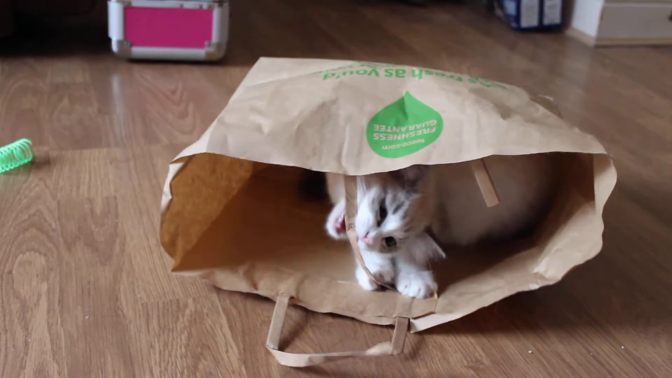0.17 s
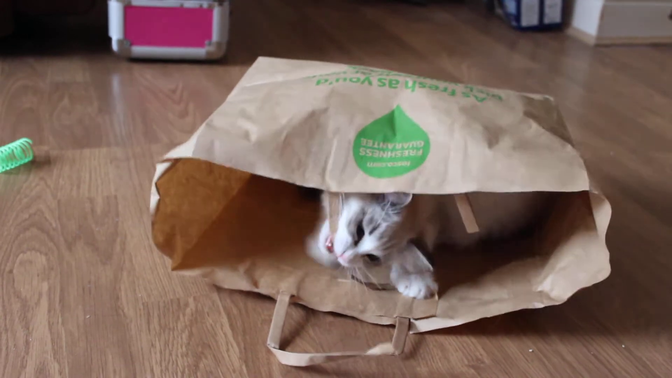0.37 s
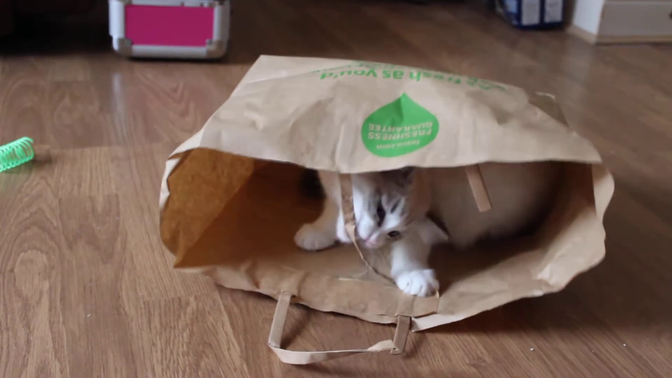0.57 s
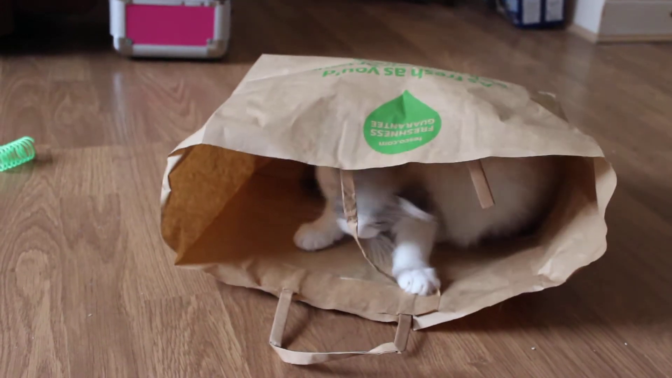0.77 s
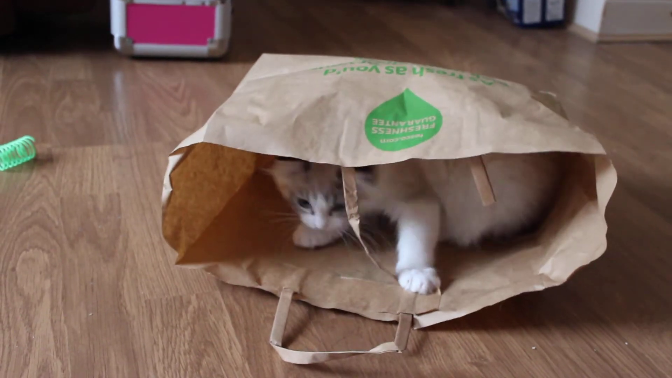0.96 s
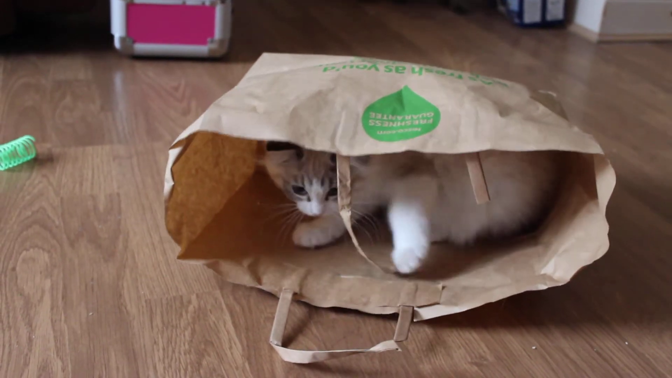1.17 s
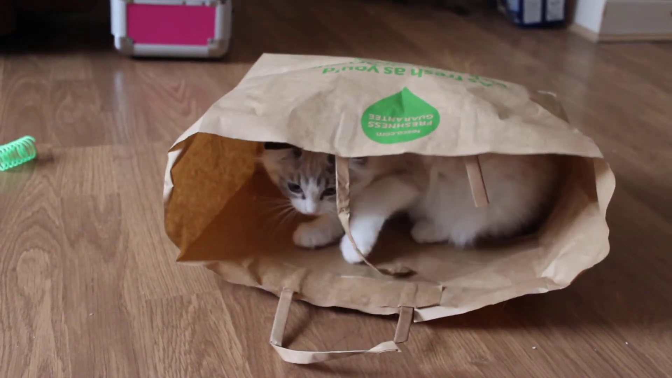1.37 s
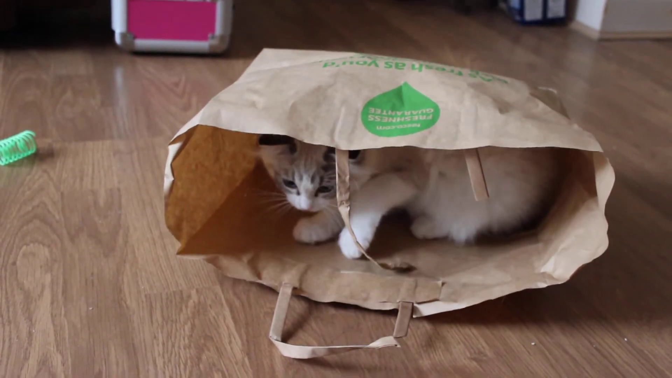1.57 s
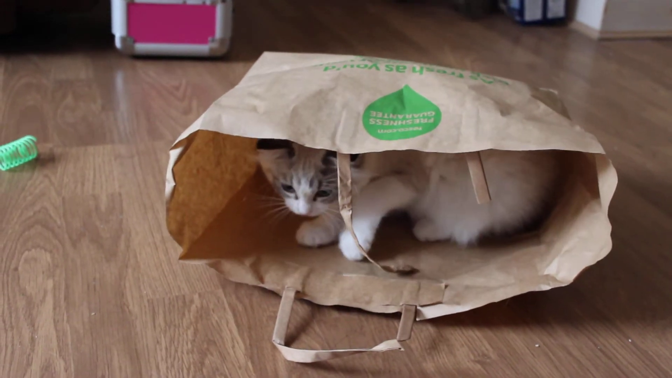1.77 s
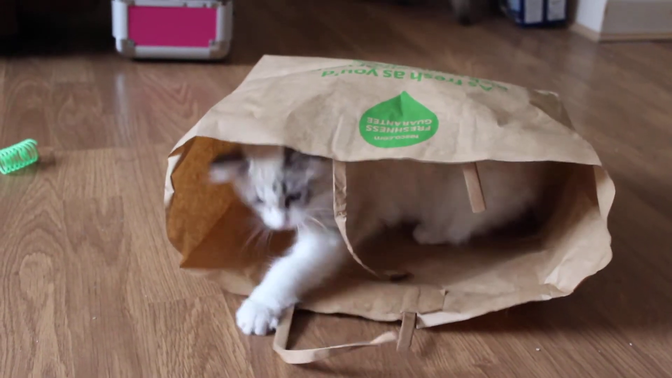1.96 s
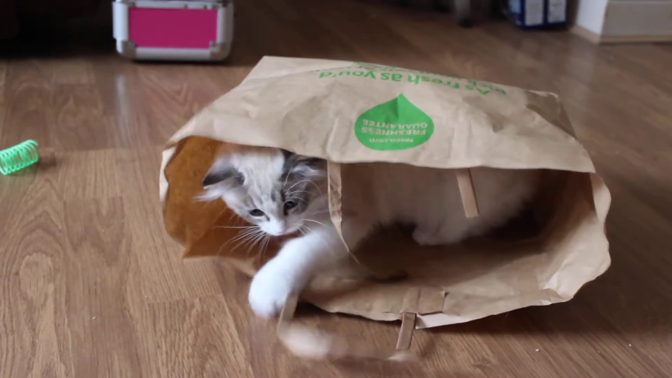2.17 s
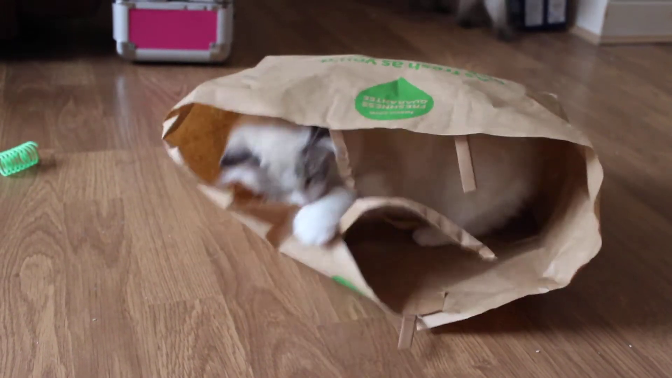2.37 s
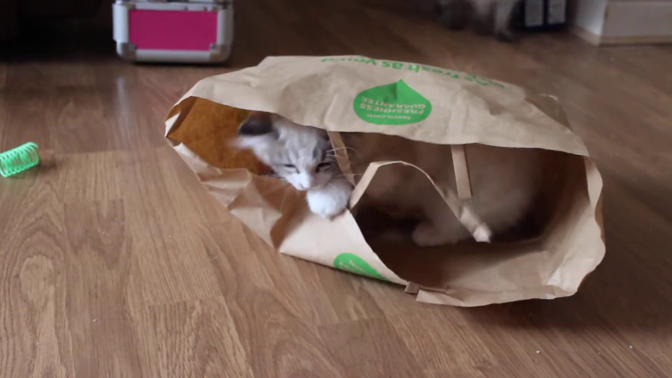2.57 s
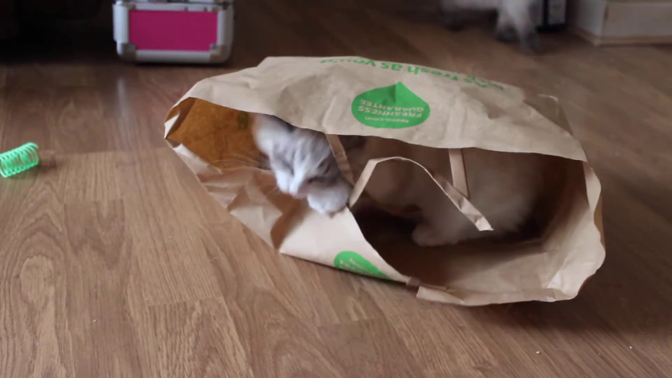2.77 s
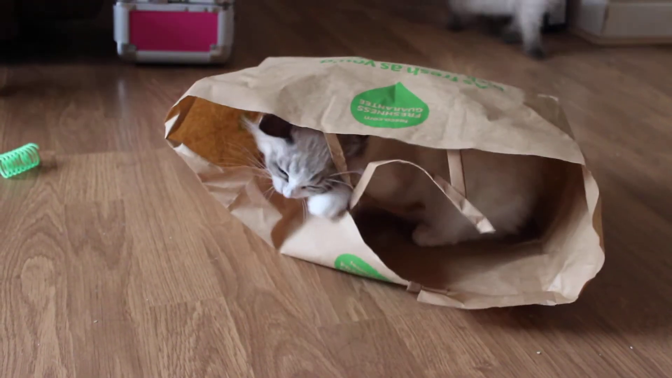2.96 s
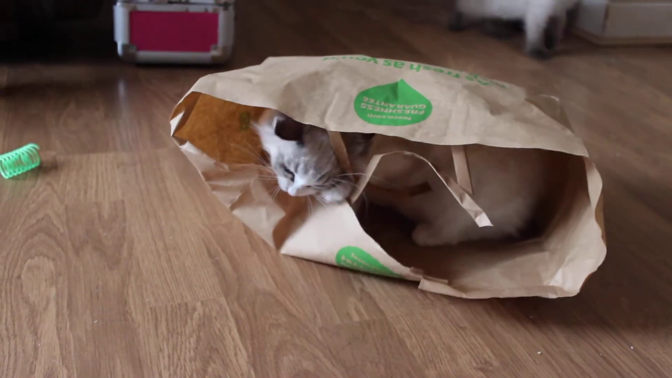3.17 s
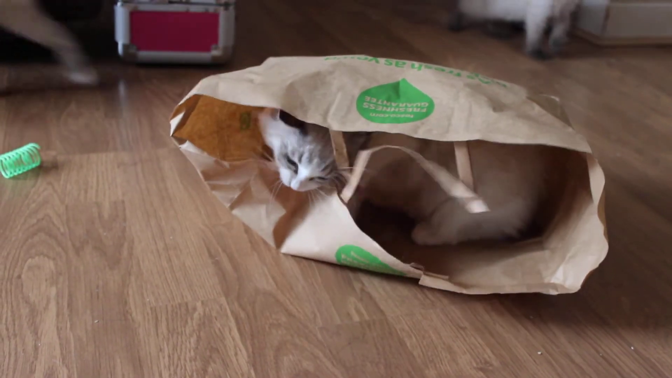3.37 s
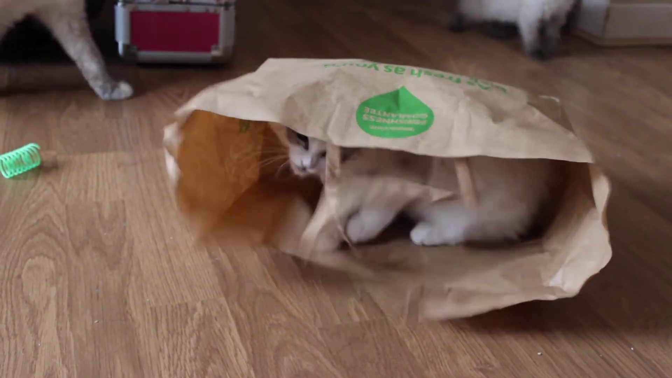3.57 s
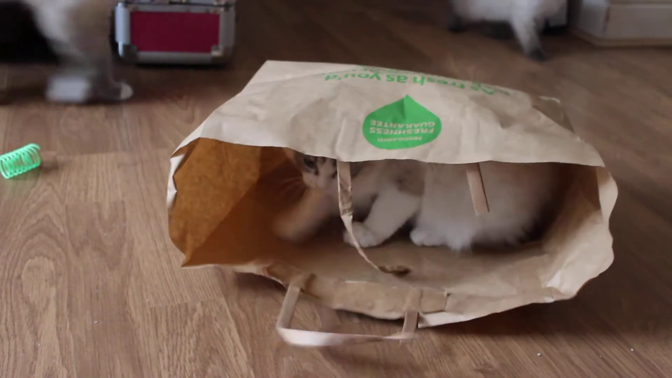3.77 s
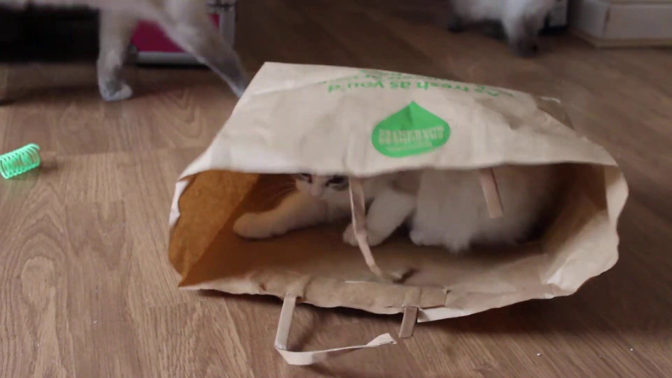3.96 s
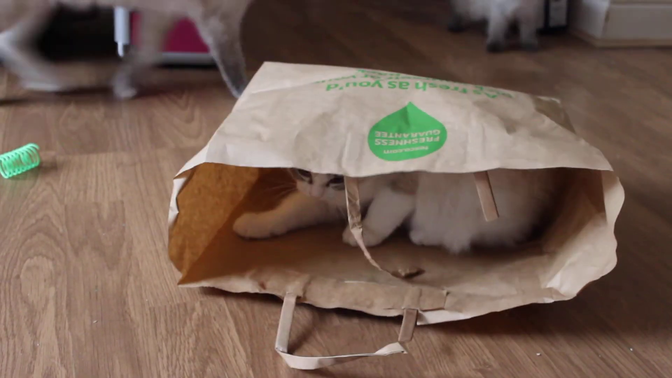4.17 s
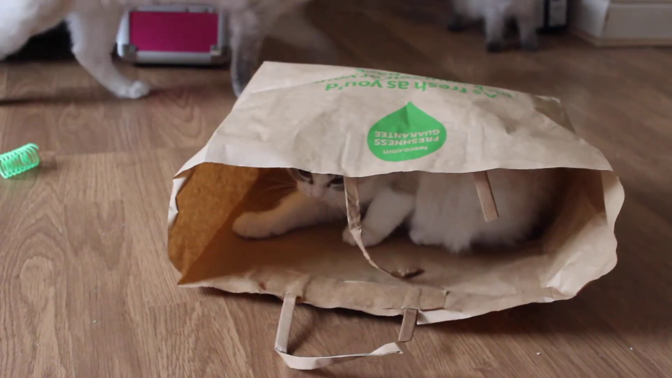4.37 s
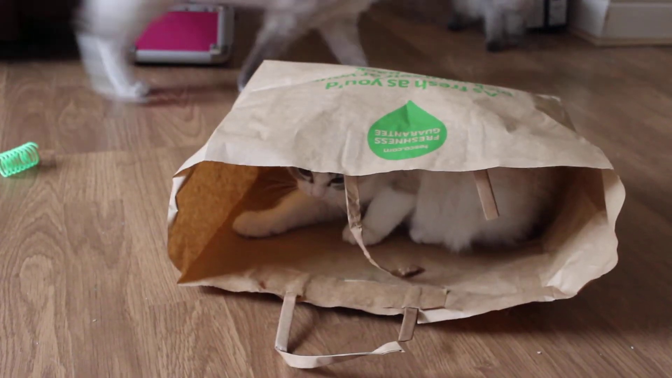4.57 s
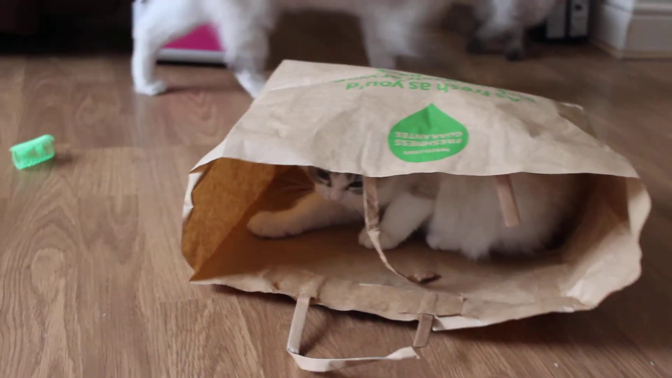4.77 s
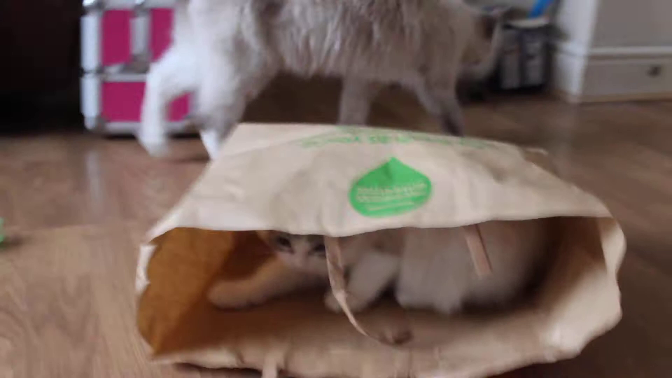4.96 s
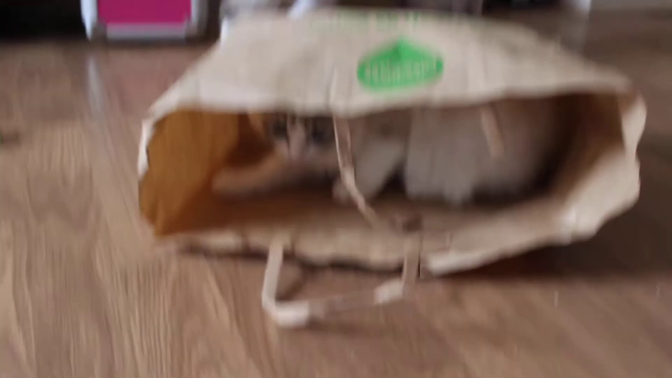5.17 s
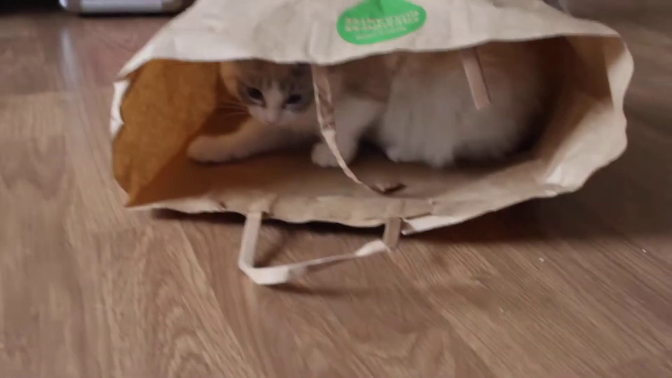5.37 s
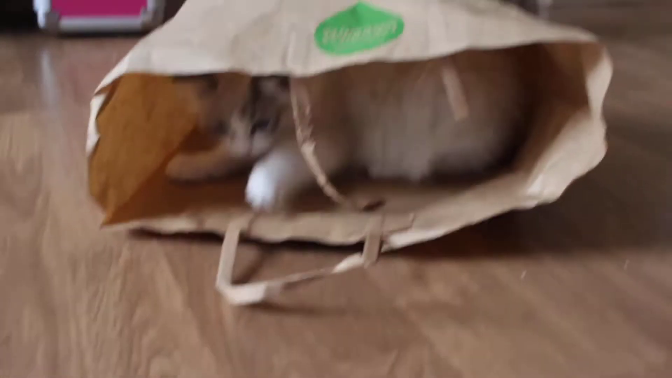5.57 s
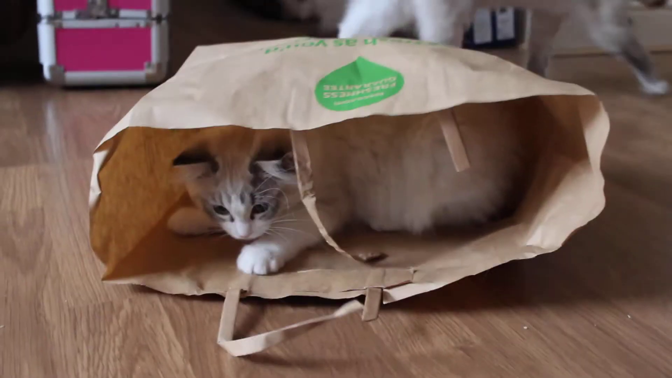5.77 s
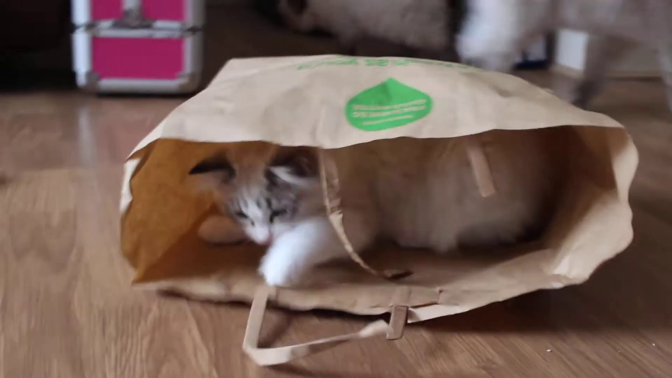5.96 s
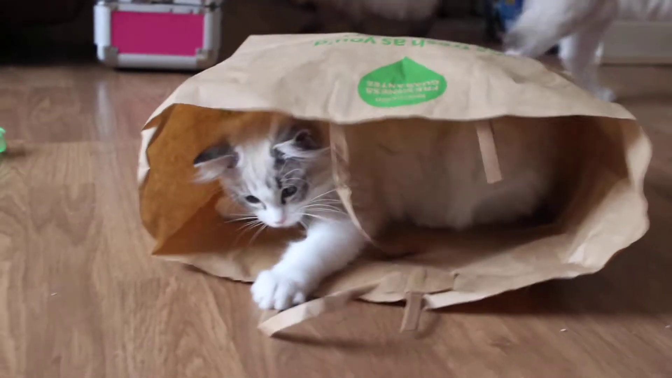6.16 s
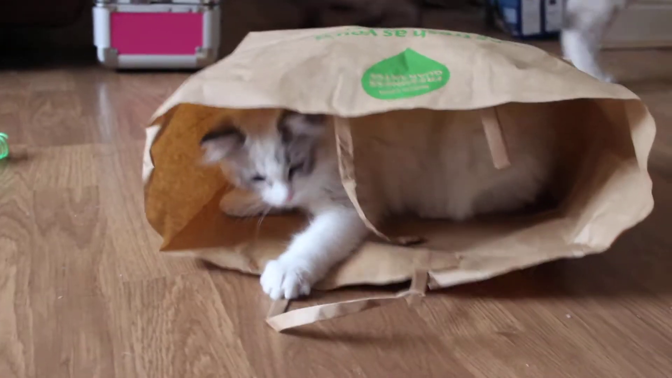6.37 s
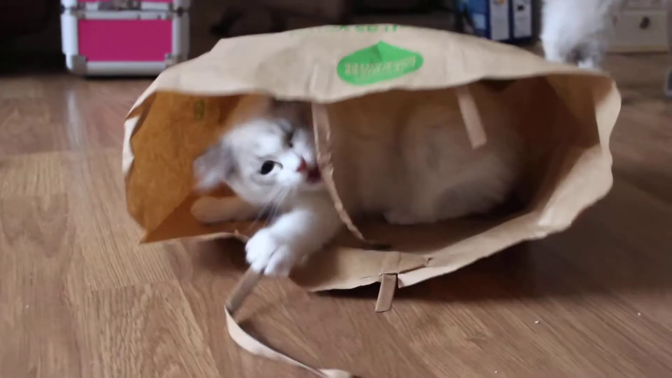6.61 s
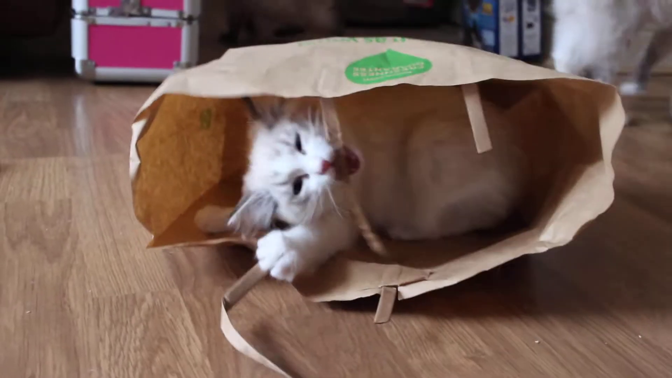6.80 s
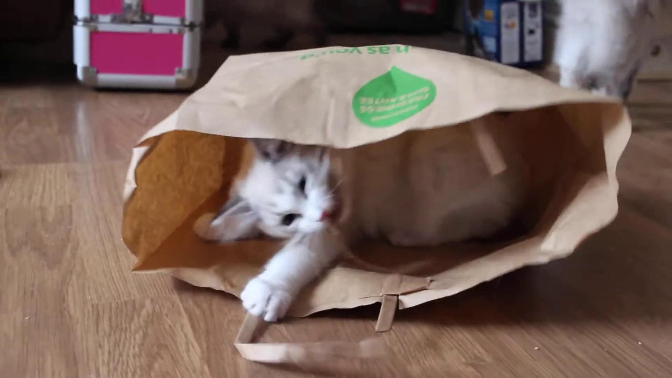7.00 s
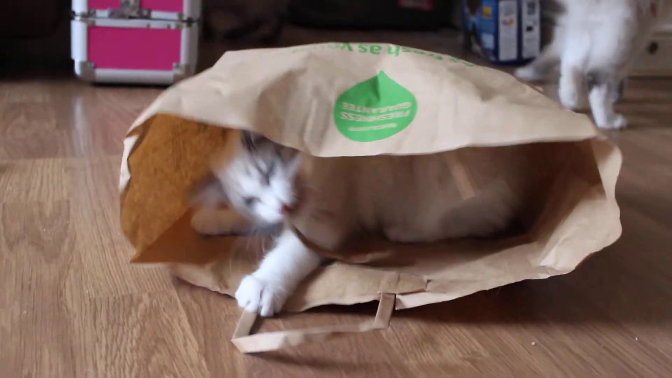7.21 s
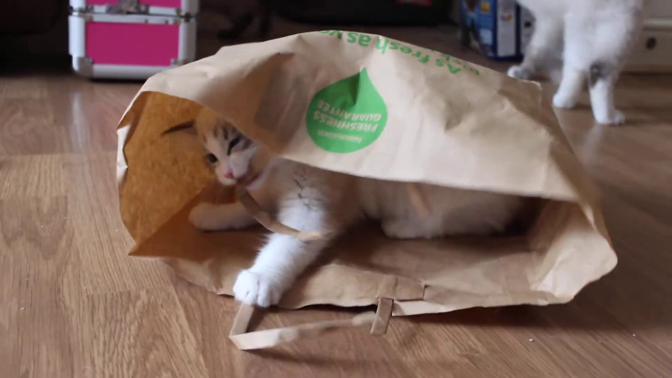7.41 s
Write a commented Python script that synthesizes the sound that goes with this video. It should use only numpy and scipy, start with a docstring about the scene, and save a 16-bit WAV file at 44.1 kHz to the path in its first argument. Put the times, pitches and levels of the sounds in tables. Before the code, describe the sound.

Crisp paper creases pop and rustle in irregular bursts as a small animal paws a bag, interrupted by dull microphone bumps and a cloth swish.

```python
"""A quiet room with a wooden floor, where a kitten moves about in a paper bag.
Creases snap as clicked noise bursts, paws and body thump the walls as damped sines, and bouts of movement
crackle, boom and hiss through the bag's resonances; fur drags sing in narrow noise bands, a small tag tinkles.
The recorder shifts in the hand with ticks, knocks and rubs, and cloth swishes past the microphone.
Behind it lie shaped hiss with a faint hum and a wandering low rumble."""
import sys
import numpy as np
from scipy import signal
from scipy.fft import rfft, irfft
from scipy.io import wavfile

SR = 44100
rng = np.random.default_rng(int(sys.argv[2]) if len(sys.argv) > 2 else 0)


def bounce(signal):
    """Save signal as a 16-bit WAV file at the path given by the first command-line argument."""
    frames = np.transpose(np.atleast_2d(signal))
    limited = np.clip(frames, -1, 1)
    pcm = np.round(limited * 32767).astype(np.int16)
    wavfile.write(sys.argv[1], SR, pcm)


N = 328104  # length in samples

# Creases that buckle, and a few sharp repeats about 10 ms after a loud snap: start_s, level_db (peak of the
# body), pitch_hz, treble_db (edge against body)
SNAPS = [(0.5197, -30.5, 930, -3), (0.574, -36, 1680, -25), (0.61, -45, 2400, -25), (1.059, -25, 2130, 1.5),
         (1.0804, -19.5, 3040, -16), (1.744, -42, 2160, 8), (1.9761, -24, 4670, 4),
         (2.212, -17.5, 5600, -2), (2.3371, -3, 2200, -40), (2.346, -9, 2780, -26),
         (2.3596, -14.5, 2570, 1.5), (2.4393, -14.5, 1650, -15), (2.4573, -7, 1610, 13.5),
         (2.495, -18.5, 2090, -24), (2.539, -19, 1810, -29), (2.8153, -27, 1780, 3.5),
         (2.8718, -23, 2700, 4), (2.9873, -10.5, 1520, -20), (2.989, -3.5, 4250, 4.5),
         (3.316, -9.5, 2170, -44), (3.48, -23.5, 3240, 1), (3.521, -25.5, 825, 14.5),
         (3.621, -15, 2370, -35), (3.632, -10, 2160, -38), (3.6574, -14, 2200, -30),
         (3.709, -18.5, 2000, 5), (3.721, -17, 3150, -4), (3.9036, -25, 2280, -7),
         (3.9424, -19.5, 2270, -48), (3.986, -23.5, 2490, -37), (4.0141, -12.5, 2060, -1),
         (4.0254, -17.5, 2600, 2), (6.0877, -17.5, 3100, -6), (6.1337, -23, 1100, 1.5),
         (6.1851, -26, 2920, -4), (6.3817, -10, 2730, -26), (6.394, -29, 3000, -20),
         (6.4069, -16.5, 3200, 4), (6.5183, -23, 1780, 0), (6.5814, -25.5, 1400, -34),
         (6.612, -19, 2580, -6), (6.6255, -26, 1470, 4.5), (6.639, -34, 1010, 8),
         (6.8632, -31.5, 7140, 0.5), (6.9599, -21, 1450, 3.5), (6.99, -18.5, 2600, -33),
         (7.127, -21.5, 1400, -25), (7.2479, -16, 1280, -17), (7.3293, -12, 3300, -3.5),
         (7.3633, -4.5, 2330, -10.5)]
# Paws and body against walls and floor: start_s, level_db, pitch_hz
THUMPS = [(0.0572, -46, 377), (0.2507, -36, 403), (0.5208, -25, 406), (1.2459, -35.5, 286),
          (1.4546, -34.5, 295), (1.85, -44.5, 248), (1.9433, -32, 243), (2.21, -29.5, 170),
          (2.4396, -27, 364), (2.7125, -22.5, 238), (2.8237, -21.5, 410), (3.4622, -21, 520),
          (3.5215, -16.5, 368), (3.6179, -18.5, 548), (3.7099, -24, 440), (4.88, -35.5, 415),
          (4.898, -29, 420), (4.911, -44, 450), (6.6975, -35.5, 356), (7.247, -26, 248),
          (7.3356, -26.5, 380)]
# Bouts of movement: start_s, length_s, crackle_db, manner (negative leans on the walls, positive slides)
RUSTLES = [(0.046, 0.063, -49.5, -1.4), (0.326, 0.044, -60, 0.74), (0.467, 0.14, -50.5, -2.9),
           (1.05, 0.065, -43.5, 0.055), (1.244, 0.067, -59.5, -1.4), (1.45, 0.11, -78, -1.7),
           (1.935, 0.14, -42, -0.13), (2.07, 0.092, -58, 0.68), (2.162, 0.24, -37, -0.38),
           (2.332, 0.11, -35, -0.19), (2.43, 0.14, -39, -0.1), (2.581, 0.13, -46, 0.36),
           (2.71, 0.057, -43, 0.51), (2.806, 0.11, -39.5, -2), (3.151, 0.18, -52, 0.44),
           (3.336, 0.053, -36.5, 0.2), (3.416, 0.16, -34, -0.72), (3.589, 0.17, -36.5, -0.29),
           (3.896, 0.11, -42, -1.3), (4.008, 0.066, -37.5, -0.083), (5.856, 0.23, -55.5, 0.46),
           (6.069, 0.042, -33.5, -0.014), (6.213, 0.044, -46, -1.8), (6.3, 0.14, -57, 0.65),
           (6.39, 0.096, -44, -0.32), (6.495, 0.14, -40, -0.47), (6.679, 0.11, -44.5, -0.44),
           (6.899, 0.15, -43.5, 0.24), (7.07, 0.053, -42, 0.65), (7.186, 0.11, -50, 0.94),
           (7.242, 0.075, -38, -0.001), (7.321, 0.093, -32.5, -0.47)]
# Fur or a finger drags on one spot: start_s, length_s, level_db, pitch_hz (at the start)
DRAGS = [(1.019, 0.074, -53, 2650), (1.079, 0.083, -47.5, 3550), (5.576, .04, -44, 1550),
         (5.693, 0.06, -48, 1550), (6.395, 0.05, -42, 3100)]
# Touches of the tag: start_s, level_db
TAG_TOUCHES = [(1.3015, -42), (1.3042, -34.5), (1.374, -47), (1.3866, -48)]
# Ringing modes of the tag: pitch_hz, level_db, t60_s
TAG_MODES = [(2540, -2, 0.04), (4780, 10, 0.011), (9200, -22, 0.026)]
# Resonances of the paper bag: pitch_hz, width_hz, level_db
BAG_RESONANCES = [(390, 256, 6.5), (676, 130, 11.5), (1400, 44, 2), (1700, 130, -9.5), (2723, 220, 6.5),
                  (4250, 130, 5), (5730, 1450, 6.5), (6900, 270, 13)]
# Spectrum of the sliding hiss: frequency_hz, density_db
SLIDE_SPECTRUM = [(1180, -39), (2000, -4.5), (2770, -4), (3580, -7), (7740, -9), (15500, -28)]
# Ticks of the recorder's case in the hand: start_s, level_db (peak of the body), pitch_hz, treble_db
CASE_TICKS = [(4.75, -27.5, 830, -6), (4.767, -23.5, 1470, -7), (4.778, -28, 3230, -10),
              (4.83, -20.5, 880, -18), (4.845, -25, 3830, -12), (4.851, -28, 3800, -14),
              (4.887, -30, 3800, -15), (4.931, -18, 950, -36), (4.959, -17.5, 1610, -1.5),
              (4.975, -19.5, 2170, 5.5), (5.311, -26, 1040, -34), (5.533, -30, 930, -40),
              (5.578, -32.5, 1600, -13), (5.597, -32, 1350, -20), (5.614, -20.5, 1520, -9),
              (5.673, -24, 1100, -34), (5.743, -36, 907, -16), (5.776, -42, 3280, -6),
              (5.827, -33.5, 1210, -26), (5.886, -15.5, 1380, -9)]
# Knocks on the case: start_s, level_db, pitch_hz
CASE_KNOCKS = [(0.07, -35, 109), (4.7247, -17, 141), (4.7665, -31, 258), (4.838, -30, 60),
               (4.9335, -9, 141), (5.3127, -14.5, 422), (5.5038, -17.5, 393), (5.5218, -14.5, 554),
               (5.6151, -16.5, 210), (5.6704, -29, 129), (6.0083, -27, 205), (6.1204, -27, 97),
               (6.3679, -27, 190), (6.4816, -25, 118.3), (6.5186, -26.5, 109)]
# Fingers rub the case: start_s, length_s, crackle_db, manner (negative presses, positive slides)
CASE_RUBS = [(4.734, 0.12, -46.5, -0.041), (4.855, 0.18, -42.5, -0.85), (5.298, 0.088, -44.5, -0.34),
             (5.512, 0.094, -44.5, -0.38), (5.601, 0.23, -48.5, -0.25), (5.75, 0.029, -69.5, 1.36)]
# Level curve of the cloth swish: time_s, level_db
SWISH_CURVE = [(4.55, -62.5), (4.9, -49.5), (4.96, -38), (5.01, -44), (5.5, -53.5), (5.95, -87)]
# Decay of the room by frequency: frequency_hz, t60_s
ROOM_DECAY = [(200, 0.28), (600, 0.3), (1500, 0.2), (4000, 0.35), (10000, 0.047)]
# Spectrum of room tone and microphone hiss, with a hum near 100 Hz: frequency_hz, density_db
QUIET_SPECTRUM = [(20, -11), (60, -11.5), (85, -13), (100, -4), (120, -11.5), (560, -12), (690, -11.5),
                  (1050, -14.5), (15500, -26)]

WALL_KICK_DB, WALL_KICK_HZ = -22.5, 393  # every snap also kicks the wall, dB against the snap's level
BOOM_DB, BOOM_PER_MANNER_DB = -1.5, -2  # wall boom against the crackle
HISS_DB, HISS_PER_MANNER_DB = -6.5, 17  # sliding layer against the crackle
SWELL_SHARE, SAG_DB, STOP_SHARE = 0.22, -2.5, 0.25  # shares of a bout's length; sag in dB
FINE_TICK_DB, RESTING_DB = -9, -49.5  # finest ticks: against a bout's crackle, and at rest
DRAG_WIDTH, DRAG_SAG = 0.13, 0.056  # shares of the pitch: width setting, fall to the end
ROOM_DB, FIRST_WALL_S, BUILD_S, WALL_CUT_HZ = -12.5, 0.005, 0.0023, 5000
QUIET_DB, RUMBLE_DB, RUMBLE_SWING_DB = -54, -69, 4
CUTOFF_HZ = 16300  # top of the microphone's range


def from_db(db):
    """Decibels to amplitude."""
    return 10 ** (np.asarray(db) / 20)


def rms_one(x):
    """Scale to an rms of 1."""
    return x / np.sqrt(np.mean(x ** 2) + 1e-20)


def at_hz(points, hz):
    """Read a curve between its points along log frequency."""
    frequencies, values = np.array(points).T
    return np.interp(np.log(hz), np.log(frequencies), values)


def filtered(x, order, hz, kind):
    """Butterworth filter."""
    return signal.sosfilt(signal.butter(order, hz, kind, fs=SR, output="sos"), x)


def band(x, low_hz, high_hz):
    """Keep a band, its top limited to 0.45 of the sample rate."""
    return filtered(x, 2, [low_hz, min(high_hz, .45 * SR)], "band")


def resonance(x, hz, width_hz):
    """Two-pole ringing, with a gain near 1 on its pitch."""
    r = np.exp(-np.pi * width_hz / SR)
    zeros = (1 - r * r) / 2 * np.array([1, 0, -1])
    poles = [1, -2 * r * np.cos(2 * np.pi * hz / SR), r * r]
    return signal.lfilter(zeros, poles, x)


def drift(rate_hz):
    """Slow random wander with an rms of 1, from noise through a double low-pass."""
    r = np.exp(-2 * np.pi * rate_hz / SR)
    noise = rng.standard_normal(N + SR)
    return rms_one(signal.lfilter([1], [1, -2 * r, r * r], noise)[SR:])  # skip the settling second


def coloured(spectrum):
    """Noise shaped to a spectrum; rms 1."""
    hz = np.maximum(np.fft.rfftfreq(N, 1 / SR), 1)
    shaped = rfft(rng.standard_normal(N)) * from_db(at_hz(spectrum, hz))
    return rms_one(irfft(shaped, N))


def add(out, start_s, sound):
    """Mix a sound into the output at its start."""
    i = round(start_s * SR)
    out[i:i + len(sound)] += sound[:len(out) - i]


def in_bag(x, plain_db):
    """The bag's resonances, their signs alternating, over a plain path."""
    out = from_db(plain_db) * x
    for k, (hz, width_hz, db) in enumerate(BAG_RESONANCES):
        out = out + (-1) ** k * from_db(db) * resonance(x, hz, width_hz)
    return out


def snaps(events, decay_s, plain_db):
    """A sudden buckle: a burst of a few ms rings around its own pitch, with a shorter bright edge."""
    out, t = np.zeros(N), np.arange(1500) / SR
    chance = rng.standard_normal((len(events), 2, len(t)))
    for (start_s, db, hz, treble_db), (body_noise, edge_noise) in zip(events, chance):
        # the fold lets go with one sharp click
        burst = band(body_noise * np.exp(-t / decay_s) + 1.37 * (t == 0), 496, 3930)
        ring = resonance(resonance(burst, hz, 0.69 * hz), hz, 0.69 * hz)
        body = in_bag(burst, plain_db) + from_db(14.5) * ring
        edge = band(edge_noise * np.exp(-t / (.5 * decay_s)) + 3.1 * (t == 0), 2550, 8270)
        body = body / np.abs(body).max()
        edge = edge / np.abs(edge).max()
        add(out, start_s, from_db(db) * (body + from_db(treble_db) * edge))
    return out


def thumps(events, cycles, rumble_s, rumble_db):
    """A soft push: a damped swing at the wall's pitch, with a short noise rumble around it."""
    out, t = np.zeros(N), np.arange(3000) / SR
    chance = rng.standard_normal((len(events), len(t)))
    soft_start = 1 - np.exp(-t / 0.0012)
    for (start_s, db, hz), noise in zip(events, chance):
        swing = -np.sin(2 * np.pi * hz * t) * np.exp(-t * hz / cycles)
        rumble = rms_one(band(noise, 0.59 * hz, 1.88 * hz)) * np.exp(-t / rumble_s)
        add(out, start_s, from_db(db) * (swing + from_db(rumble_db) * rumble) * soft_start)
    return out


def rustle(table, low_hz, high_hz, plain_db):
    """Small creases crackle, walls boom loosely, and sliding adds wavering hiss with the finest crackle."""
    boom = band(grains(600, spread_db=2.0, clump_db=4.5), 98, 600)
    wall_hz, wall_width_hz = BAG_RESONANCES[0][:2]
    boom = rms_one(boom + from_db(-7.0) * resonance(boom, wall_hz, wall_width_hz))
    hiss = from_db(3.94 * drift(60)) * coloured(SLIDE_SPECTRUM)
    slide = hiss + from_db(-2.5) * crackle(3000, 12800, plain_db)
    return (bouts(table, 0, 0) * crackle(low_hz, high_hz, plain_db)
            + bouts(table, BOOM_DB, BOOM_PER_MANNER_DB) * boom
            + bouts(table, HISS_DB, HISS_PER_MANNER_DB) * slide)


def bouts(table, base_db, per_manner_db):
    """Each bout swells fast, sags a little and stops; its manner sets the mix."""
    t, gain = np.arange(N) / SR, np.zeros(N)
    for start_s, length_s, db, manner in table:
        corners = start_s + length_s * np.array([0, SWELL_SHARE, 1 - STOP_SHARE, 1 + STOP_SHARE])
        shape = np.interp(t, corners, [0, 1, from_db(SAG_DB), 0])
        gain += from_db(db + base_db + per_manner_db * manner) * shape
    return gain


def crackle(low_hz, high_hz, plain_db):
    """Each small crease clicks at one of seven pitches and rings briefly inside the bag's resonances."""
    clicks = grains(1500, spread_db=3.9, clump_db=5)
    pitches = np.geomspace(low_hz, high_hz, num=7)
    dealt = rng.integers(len(pitches), size=N)
    rings = np.zeros(N)
    for k, hz in enumerate(pitches):
        own = clicks * (dealt == k) + 1e-18  # an inaudible offset
        rings += resonance(resonance(own, hz, 0.44 * hz), hz, 0.44 * hz) / hz
    return rms_one(in_bag(rings, plain_db))


def grains(per_s, spread_db, clump_db):
    """Random clicks of very uneven size that come in clumps."""
    sizes = from_db(spread_db * np.minimum(rng.exponential(1, N), 5)) * rng.choice([-1, 1], N)
    return sizes * (rng.random(N) < per_s * from_db(clump_db * drift(25)) / SR)


def fine_ticks():
    """The thinnest creases give lone high ticks: faint at rest, louder in movement."""
    ticks = band(grains(40, spread_db=6.0, clump_db=2), 4500, 15000)
    movement = bouts([*RUSTLES, *CASE_RUBS], FINE_TICK_DB, 2.5)
    return (from_db(RESTING_DB) + movement) * ticks


def drags():
    """Dragging sings: a wavering narrow noise band sinks a little and fades."""
    out = np.zeros(N)
    chance = rng.standard_normal((len(DRAGS), 2, 5000))
    for (start_s, length_s, db, hz), noise in zip(DRAGS, chance):
        part = np.arange(min(round(length_s * SR), 5000)) / (length_s * SR)  # 0 to 1 through the drag
        r = np.exp(-np.pi * DRAG_WIDTH * hz / SR)
        slow = rms_one(signal.lfilter([1], [1, -2 * r, r * r], noise))
        a, b = slow[:, :len(part)]
        phase = 2 * np.pi * np.cumsum(hz * (1 - DRAG_SAG * part)) / SR
        tone = a * np.cos(phase) + b * np.sin(phase)
        add(out, start_s, from_db(db) * tone * np.sin(np.pi * part ** 0.36))  # quick rise, slower fade
    return out


def tag():
    """Each touch strikes the tag's modes, decaying sines."""
    out, t = np.zeros(N), np.arange(SR // 4) / SR
    ring = sum(from_db(db - 60 * t / t60_s) * np.sin(2 * np.pi * hz * t) for hz, db, t60_s in TAG_MODES)
    for start_s, db in TAG_TOUCHES:
        add(out, start_s, from_db(db) * ring * (1 - np.exp(-t / 0.00015)))
    return out


def paper_bag():
    """Everything that moves in the bag; each snap kicks the wall too."""
    kicks = [(start_s, db + WALL_KICK_DB, WALL_KICK_HZ) for start_s, db, *_ in SNAPS]
    return (snaps(SNAPS, decay_s=0.0028, plain_db=-9.0)
            + thumps([*THUMPS, *kicks], cycles=3.33, rumble_s=0.0093, rumble_db=-3.0)
            + tag()
            + rustle(RUSTLES, low_hz=900, high_hz=3850, plain_db=2.5)
            + fine_ticks() + drags())


def hand():
    """The recorder shifts in the hand: sound comes through its case, dry and with little of the bag."""
    return (snaps(CASE_TICKS, decay_s=0.0022, plain_db=3.5)
            + thumps(CASE_KNOCKS, cycles=0.57, rumble_s=0.0036, rumble_db=-1.5)
            + rustle(CASE_RUBS, low_hz=1100, high_hz=2070, plain_db=16))


def swish():
    """Cloth passes the microphone: a smooth, broad hiss on a level curve."""
    time_s, level_db = np.transpose(SWISH_CURVE)
    hiss = filtered(rng.standard_normal(N), 1, [800, 6000], "band")
    level = np.interp(np.arange(N) / SR, time_s, level_db, left=-120, right=-120)
    return from_db(level) * rms_one(hiss)


def room(x):
    """Reverberation: noise that dies band by band, after a short wait for the first wall."""
    t = np.arange(SR // 2) / SR
    edges = 60 * 2. ** np.arange(9)  # octaves
    tail = np.zeros(len(t))
    for low, high in zip(edges, edges[1:]):
        t60_s = at_hz(ROOM_DECAY, np.sqrt(low * high))
        tail += band(rng.standard_normal(len(t)), low, high) * from_db(-60 * t / t60_s)
    tail = (1 - np.exp(-t / BUILD_S)) * tail / np.sqrt(np.sum(tail ** 2))
    tail = np.concatenate([np.zeros(round(FIRST_WALL_S * SR)), tail])
    dull = filtered(x, 1, WALL_CUT_HZ, "low")  # walls return less treble
    return signal.fftconvolve(dull, tail)[:N]


def background():
    """Room tone and microphone hiss as shaped noise; a low rumble comes and goes."""
    rumble = rms_one(band(rng.standard_normal(N), 29, 88))
    rumble_level = from_db(RUMBLE_DB + RUMBLE_SWING_DB * drift(6.6))
    return from_db(QUIET_DB) * coloured(QUIET_SPECTRUM) + rumble_level * rumble


def scene():
    """The bag sounds in the room; hand, cloth and background stay dry."""
    bag = paper_bag()
    return (bag + from_db(ROOM_DB) * room(bag) + hand() + swish() + background())[None]


def record(dry):
    """The microphone drops the deepest bass, clips at full scale and cuts the top."""
    heard = filtered(dry, 2, 45, "high")
    clipped = np.clip(heard, -1, 1)
    return signal.sosfilt(signal.cheby2(12, 60, CUTOFF_HZ, fs=SR, output="sos"), clipped)


dry = scene()
out = record(dry)
bounce(out)
```